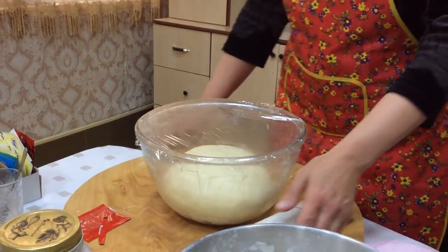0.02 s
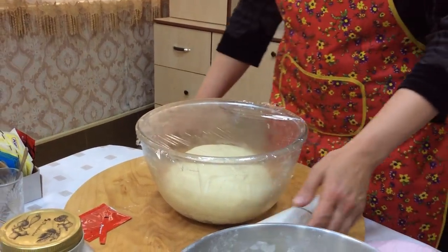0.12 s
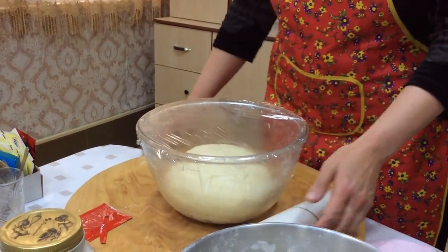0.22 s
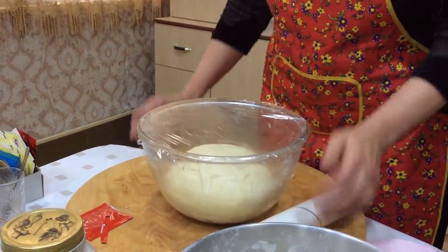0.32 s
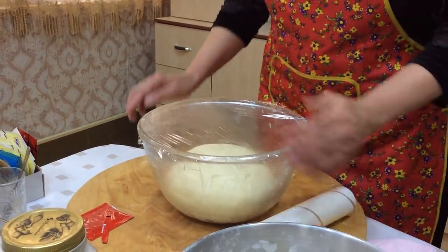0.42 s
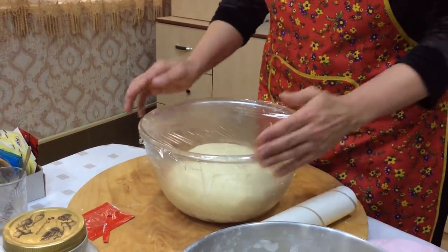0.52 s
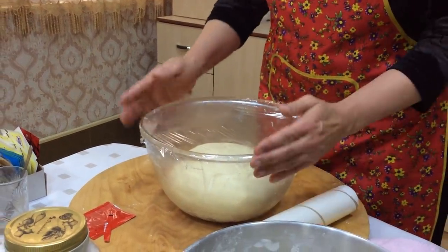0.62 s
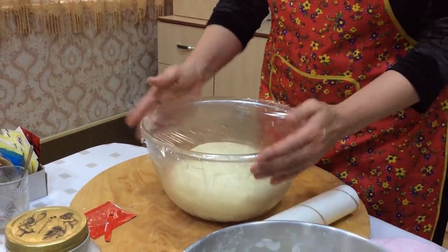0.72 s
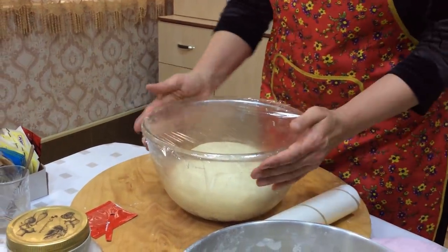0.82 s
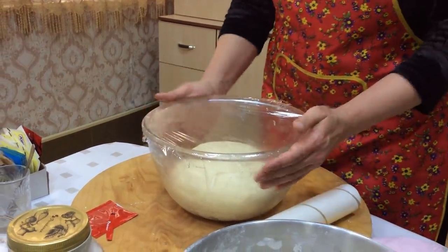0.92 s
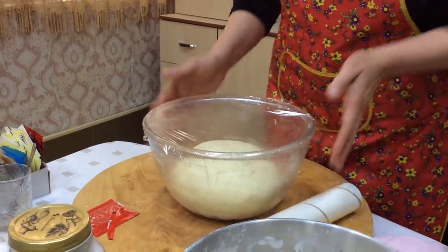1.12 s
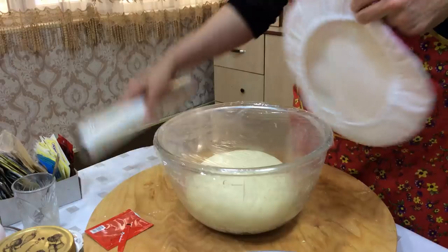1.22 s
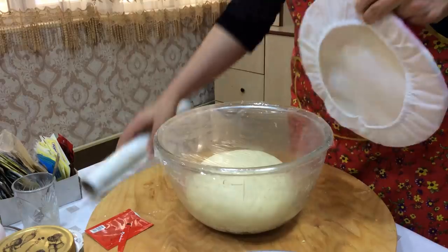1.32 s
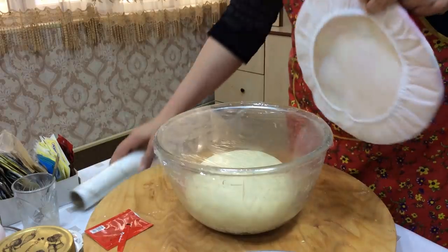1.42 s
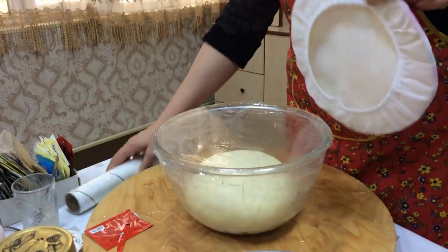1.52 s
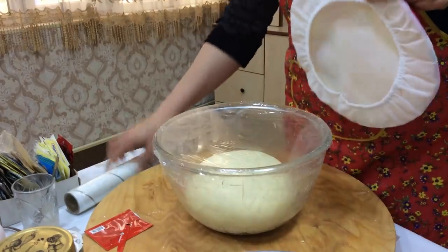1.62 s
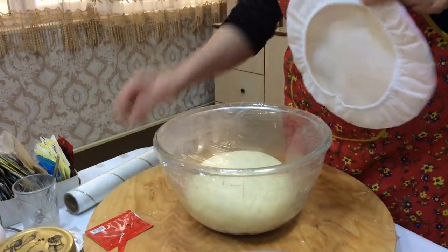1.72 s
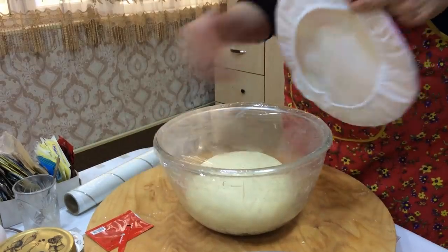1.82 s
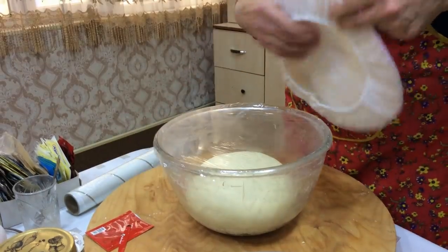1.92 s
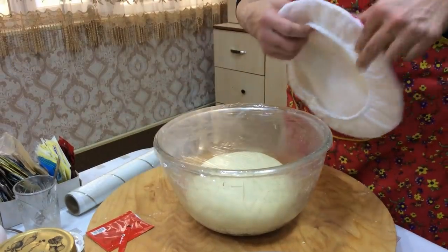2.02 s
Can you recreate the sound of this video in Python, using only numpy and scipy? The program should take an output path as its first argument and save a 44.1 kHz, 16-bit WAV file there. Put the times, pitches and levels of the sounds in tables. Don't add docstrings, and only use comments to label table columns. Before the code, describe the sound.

A cardboard roll knocks on wood: light ticks at 0.06-0.13 s, a loud hollow clack at 0.21, a weak bounce at 0.33. Cling film rustles softly around 0.6-1.15, with a crisp snap near 0.85. Sound drops to silence at 1.23-1.28. A soft low thump at 1.55, then a duller double knock at 1.66, small settling taps and a faint rustle at 2.0. Low fridge hum, small kitchen.

```python
import sys
import numpy as np
from scipy import signal
from scipy.fft import rfft, irfft
from scipy.io import wavfile
from scipy.ndimage import uniform_filter1d

SR = 44100
rng = np.random.default_rng(int(sys.argv[2]) if len(sys.argv) > 2 else 0)


def gain_from_decibels(decibels):
    exponent = np.asarray(decibels, float) / 20
    return 10 ** exponent


def store_pcm(level_fs):
    pcm = np.round(np.clip(level_fs, -1, 1) * 32767).astype(np.int16)
    wavfile.write(sys.argv[1], SR, np.atleast_2d(pcm).T)


N = 90405


def rms_one(x):
    return x / np.sqrt(np.mean(x ** 2) + 1e-20)


def drift(rate):
    pole = np.exp(-80 * np.pi * rate / SR)
    white = rng.standard_normal(N // 40 + 2002)
    slow = signal.lfilter([1], [1, -2 * pole, pole * pole], white)[2000:]
    return np.interp(np.arange(N) / 40, np.arange(len(slow)), rms_one(slow))


def resonate(x, hz, width_hz):
    r = np.exp(-np.pi * width_hz / SR)
    poles = [1, -2 * r * np.cos(2 * np.pi * hz / SR), r * r]
    return signal.lfilter([(1 - r * r) / 2, 0, (r * r - 1) / 2], poles, x)


def narrow_noise(hz, width_hz, lead=0):
    white = rng.standard_normal(N + lead)
    return rms_one(resonate(resonate(white, hz, width_hz), hz, width_hz)[lead:])


def high_pass(x, order, cut_hz):
    return signal.sosfilt(signal.butter(order, cut_hz, "high", fs=SR, output="sos"), x)


def bands(white):
    edges = 22 * 2 ** np.arange(0, 9.6, .5)
    bank = []
    for k, (low, high) in enumerate(zip(edges, edges[1:])):
        band_pass = signal.butter(2, [low, high], "band", fs=SR, output="sos")
        bank.append((np.sqrt(low * high), signal.sosfilt(band_pass, white[k % 2])))
    return bank


def coloured(white, spectrum, patchy_db):
    hz, db = np.transpose(spectrum)
    together = drift(9.6)
    total = 0
    for centre, band in bands(white):
        flicker_db = patchy_db * (.6 * together + drift(15))
        total = total + band * gain_from_decibels(np.interp(np.log(centre), np.log(hz), db) + flicker_db)
    return rms_one(total)


def knocks(hits, modes):
    out = np.zeros(N)
    spread_db = rng.normal(0, 1.2, (len(hits), len(modes)))
    for (s, db, cut_hz), own_db in zip(hits, spread_db):
        start = int(s * SR)
        click = np.zeros(N - start) + 1e-18
        click[0] = 1
        soft = signal.sosfilt(signal.butter(4, min(cut_hz, 18000), fs=SR, output="sos"), click)
        for k, ((hz, level_db, t60), mode_db) in enumerate(zip(modes, own_db)):
            r = gain_from_decibels(-60 / (t60 * SR))
            w = 2 * np.pi * hz / SR
            ring = signal.lfilter([0, np.sin(w)], [1, -2 * r * np.cos(w), r * r], soft)
            out[start:] += (-1) ** k * gain_from_decibels(db + level_db + mode_db) * ring
    return out


def fridge():
    # multiple of the hum, level/dB
    hum_upper = [(2.0, -65.5), (2.4, -68.5), (4.0, -69.5), (4.4, -67)]
    # f/Hz, density/(dB per Hz)
    air = [(15, -55), (32, -7.5), (113, -5), (359, -8), (433, -15.5), (1020, -23.5), (1380, -26),
           (2360, -27), (15500, -45.5)]
    hum_hz, hum_width_hz = 100.9, 22
    t = np.arange(N) / SR
    steady_level = gain_from_decibels(-51.5 + 1.2 * drift(4.6))
    out = steady_level * np.sqrt(2) * np.sin(2 * np.pi * hum_hz * t)
    for multiple, db in [(0.97, -60)] + hum_upper:
        out = out + gain_from_decibels(db) * narrow_noise(multiple * hum_hz, hum_width_hz, SR)
    return out + gain_from_decibels(-54.5) * coloured(rng.standard_normal((2, N)), air, 0.34)


def film():
    # t/s, level/dB
    rub = [(.2, -63.5), (0.599, -66.5), (.63, -58), (.71, -60), (.75, -70), (.8, -63.5), (0.858, -47),
           (0.93, -61.5), (.99, -55), (1.06, -51), (1.146, -60), (1.171, -65), (1.3, -61), (1.42, -63.5),
           (1.52, -65), (1.7, -63.5), (2.008, -67), (2.029, -53)]
    # f/Hz, density/(dB per Hz)
    rustle_colour = [(710, -62), (1200, -49), (1900, -3), (2230, -40), (3010, -11.5), (3650, -10.5),
                     (7810, -7.5), (15500, -9)]
    # f/Hz, width/Hz, level under the rustle/dB
    squeaks = [(1908, 52, -18.5), (3010, 63, -17), (5570, 22, -20.5), (8010, 94, -17.5), (9050, 240, -16.5),
               (10900, 130, -22), (12300, 210, -16.5)]
    grains_per_s, grain_spread_db = 6500, 0.5
    sizes = gain_from_decibels(grain_spread_db * np.minimum(rng.exponential(1, (2, N)), 5))
    sizes = sizes * rng.choice([-1, 1], (2, N))
    slips = sizes * (rng.random((2, N)) < grains_per_s / SR)
    rustle = coloured(slips, rustle_colour, .8)
    for hz, width_hz, level_db in squeaks:
        rustle = rustle + gain_from_decibels(level_db + 2.26 * drift(26)) * narrow_noise(hz, width_hz)
    s, db = np.transpose(rub)
    return gain_from_decibels(np.interp(np.arange(N) / SR, s, db)) * rustle


def tails():
    # t/s, level/dB, t60/s, centre f/Hz, width/octaves
    room_tails = [
        (0.062, -57, 1, 656, 1.9),
        (0.208, -32.5, 0.44, 780, 1.21),
        (0.223, -35.5, 0.34, 94, 0.83),
        (0.214, -40, 0.14, 250, 1.13),
        (1.558, -44, 0.3, 272, 0.86),
        (1.658, -37, 0.49, 450, 0.88),
    ]
    # f/Hz, width/Hz, level/dB
    sympathy = [(158, 8.9, 13), (213, 43, 16), (369, 43, -6), (509, 2.4, -1.5), (702, 38, 3.5),
                (875, 7.6, -10), (954, 15, -13), (1458, 11, 0.5)]
    treble_db, skirt_db, rise_s = -42, 10, 0.0027
    t, out = np.arange(N) / SR, 0
    for f, band in bands(rng.standard_normal((2, N))):
        for s, db, t60, hz, octaves in room_tails:
            age = np.maximum(t - s, 0)
            colour = gain_from_decibels(-skirt_db * (np.log2(f / hz) / octaves) ** 2) + gain_from_decibels(treble_db) * (f > hz)
            band_t60 = t60 * (f / hz) ** -.12
            decay = gain_from_decibels(db + 18.0 - 60 * age / band_t60)
            out = out + band * colour * decay * (1 - np.exp(-age / rise_s))
    out = high_pass(out, 4, 50)
    return out + sum(gain_from_decibels(db) * resonate(out, hz, width_hz) for hz, width_hz, db in sympathy)


def cracks():
    # t/s, level/dB, t60/s
    bursts = [
        (0.064, -51.5, 0.04),
        (0.109, -51, 0.032),
        (0.2103, -46, 0.094),
        (0.242, -50.5, 0.096),
        (0.843, -40, 0.0043),
        (1.656, -51.5, 0.095),
    ]
    t = np.arange(N) / SR
    hiss = rms_one(high_pass(rng.standard_normal(N), 2, 2730))
    return hiss * sum(gain_from_decibels(db - 60 * np.maximum(t - s, 0) / t60) * (t >= s) for s, db, t60 in bursts)


def end_ticks():
    # t/s, level/dB, contact cut f/Hz
    taps = [
        (.0645, -40, 5000),
        (.068, -36, 1240),
        (.077, -49, 1500),
        (.082, -52, 1210),
        (.108, -44.5, 9000),
        (.131, -50, 6000),
        (1.289, -53, 2000),
    ]
    # f/Hz, level/dB, t60/s
    tick_modes = [(226, -7, 0.076), (526, -2, 0.045), (631, 0, 0.083), (1105, -13.5, 0.099),
                  (1485, -11, 0.11), (2800, -0.5, 0.023), (5140, -7, 0.0097)]
    return knocks(taps, tick_modes)


def board_drop():
    # t/s, level/dB, contact cut f/Hz
    impacts = [
        (.2093, -25.5, 4800),
        (.2100, -21, 1500),
        (.2140, -27, 1400),
        (.2238, -26, 2010),
    ]
    # f/Hz, level/dB, t60/s
    board_modes = [(239, -16, 0.12), (301, -15, 0.17), (392.4, -1, 0.204), (490, -13.5, 0.38),
                   (646, -17, .4), (691, -18, 0.28), (817, -9, 0.093), (946, -10.5, 0.042),
                   (890, -6.5, 0.057), (1205, 1, 0.028), (1427, -16, 0.39), (1608, -9.5, 0.25),
                   (874.4, -11, 0.41), (2710, -3.5, 0.034)]
    return knocks(impacts, board_modes)


def tube_claps():
    # t/s, level/dB, contact cut f/Hz
    claps = [
        (.2096, -23, 4020),
        (.2124, -18, 1330),
        (1.658, -27, 860),
        (1.667, -21, 850),
        (.328, -53, 1170),
        (1.725, -37, 790),
        (1.815, -46, 800),
        (1.871, -53.5, 900),
        (2.0215, -48.5, 5040),
        (2.032, -63, 2540),
    ]
    # f/Hz, level/dB, t60/s
    tube_modes = [(450, 0, 0.017), (687, 4.5, 0.032), (1030, -1, 0.006), (1400, -18, 0.0084),
                  (2415, -5, 0.028), (3135, -13.5, 0.028)]
    return knocks(claps, tube_modes)


def board_bounce():
    # t/s, level/dB, contact cut f/Hz
    rebound = [
        (.326, -37.5, 1500),
    ]
    # f/Hz, level/dB, t60/s
    bounce_modes = [(680, 0.5, .12), (925, -5.5, 0.093), (492, -5.5, 0.32), (692, -8.5, 0.28),
                    (400, -12.5, 0.42), (1097, -15.5, 0.39), (1604, -9, 0.12)]
    return knocks(rebound, bounce_modes)


def brushes():
    # t/s, length/s
    strokes = [
        (1.358, .065),
        (.67, .02),
        (1.685, .12),
        (2.02, .1),
        (1.87, .05),
        (.625, .02),
    ]
    # f/Hz, width/share of f, level/dB
    stroke_sounds = [(5030, 0.39, -59), (5200, 0.32, -63), (3060, 0.51, -64), (1500, 0.6, -56.5),
                     (6000, 0.47, -67), (850, 0.18, -64)]
    t, out = np.arange(N) / SR, 0
    for (s, length), (hz, share, db) in zip(strokes, stroke_sounds):
        shape = np.sin(np.pi * np.clip((t - s) / length, 0, 1)) ** .5
        out = out + gain_from_decibels(db) * shape * narrow_noise(hz, hz * share)
    return out


def soft_settle():
    # t/s, level/dB, contact cut f/Hz
    touches = [
        (1.5538, -31, 560),
        (1.632, -42, 400),
    ]
    # f/Hz, level/dB, t60/s
    cloth_modes = [(161, -1, 0.43), (420, -15, 0.15), (242, -3, .3), (960, -6, .05), (270, -7, 0.025),
                   (620, -30, .1), (330, -24, .2)]
    return knocks(touches, cloth_modes)


def table_lay():
    # t/s, level/dB, contact cut f/Hz
    contacts = [
        (1.658, -30.5, 900),
        (1.6708, -30, 625),
        (1.681, -34, 616),
        (1.70, -42, 700),
    ]
    # f/Hz, level/dB, t60/s
    table_modes = [(84.3, -12, 0.32), (135.5, -9.5, 0.6), (159.6, -7, 0.35), (184, -13.5, 0.99),
                   (224.9, -8, 0.38), (574, -16, .25), (390.6, 2.5, 0.09), (740, -19, 0.11),
                   (505, -3, 0.028), (700, -1, 0.054), (673, -19, 0.52), (900, -23, 0.025),
                   (930, -17, 0.48)]
    return knocks(contacts, table_modes)


def thin_treble(x):
    # t/s, lowest f/Hz, share of lines kept, depth (above 1 also lasts longer)
    thinned = [
        (.047, 1700, .05, 1.1),
        (.231, 3400, .015, 1.1),
        (.28, 3300, .1, .7),
        (.605, 600, .05, .75),
        (.885, 600, .07, .75),
        (1.022, 600, .07, .7),
        (1.165, 800, .07, .65),
        (1.498, 900, .04, 1.4),
        (1.997, 1900, .06, .85),
    ]
    kept_boost_db, deepest_loss = 3, .995
    out = x.copy()
    for s, from_hz, share, depth in thinned:
        size = 2 * int(.04 * max(depth, 1) * SR / 2)
        i = int(s * SR) - size // 2
        hz = np.arange(size // 2 + 1) * SR / size
        lines = rfft(x[i:i + size] * signal.windows.tukey(size, .7))
        height = np.abs(lines) / uniform_filter1d(np.abs(lines), size=61)
        weak = height < np.quantile(height, np.clip(1 - share, 0, 1))
        loss = np.where(weak, np.clip(depth, 0, deepest_loss), 1 - gain_from_decibels(kept_boost_db))
        out[i:i + size] -= irfft(lines * (hz > from_hz) * loss, size)
    return out


def scene():
    hits = end_ticks() + board_drop() + tube_claps() + board_bounce() + soft_settle() + table_lay()
    hits = high_pass(hits, 2, 64)
    return (fridge() + film() + tails() + cracks() + hits + brushes())[None]


def roll_off(x):
    return signal.sosfilt(signal.butter(12, 16100, fs=SR, output="sos"), x)


def record(dry):
    silence_from, silence_to, silence_db = 1.2337, 1.2812, -36
    t = np.arange(N) / SR
    fading = gain_from_decibels(silence_db - 380 * np.maximum(t - silence_from, 0))
    gate = np.where((t > silence_from) & (t < silence_to), fading, 1)
    x = thin_treble(dry[0])[None] * gate
    x = signal.sosfilt(signal.cheby2(22, 60, 15720, fs=SR, output="sos"), x)
    return roll_off(x)


dry = scene()
out = record(dry)
store_pcm(out)
```